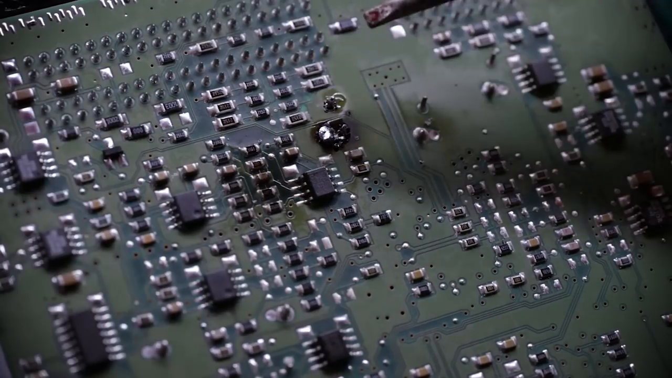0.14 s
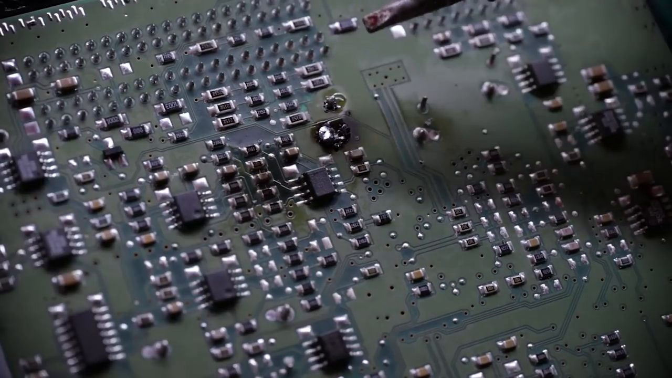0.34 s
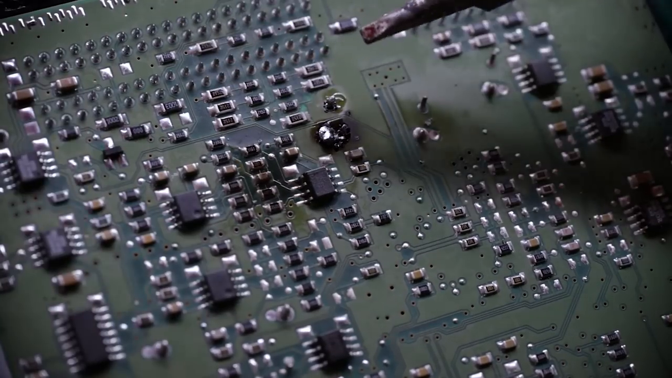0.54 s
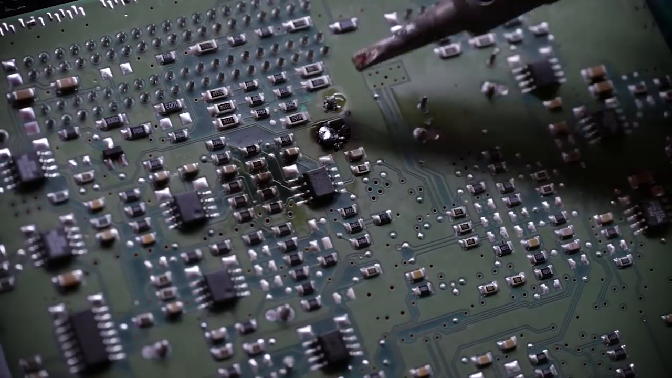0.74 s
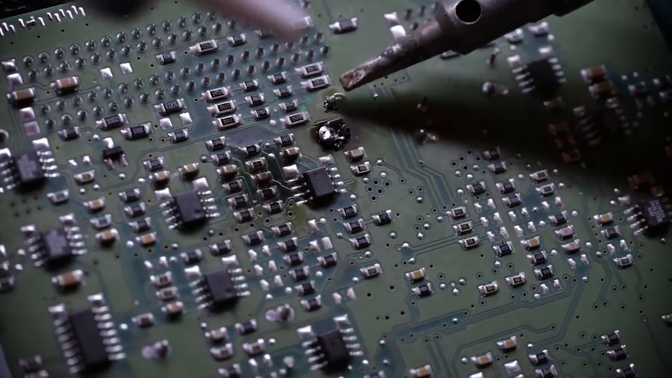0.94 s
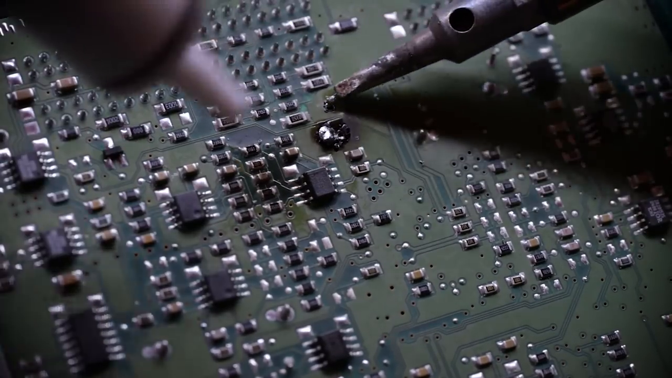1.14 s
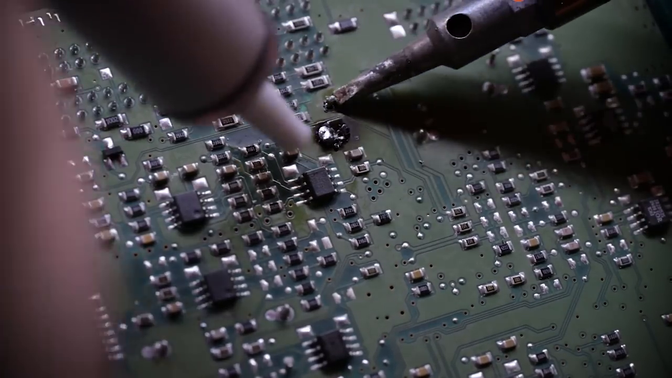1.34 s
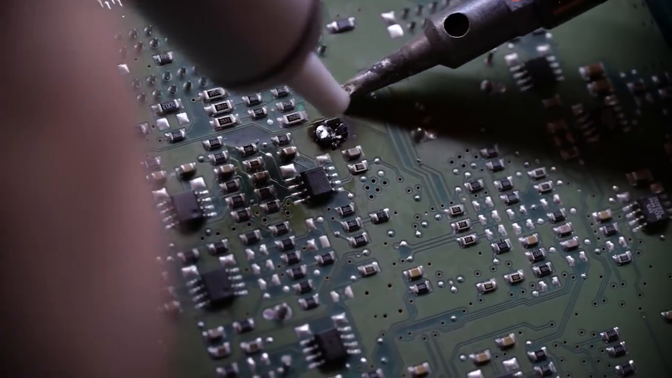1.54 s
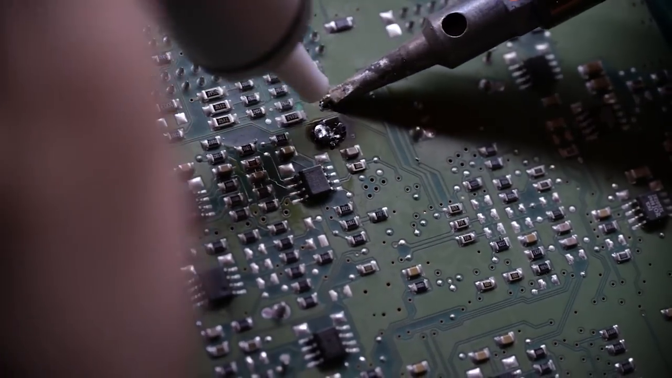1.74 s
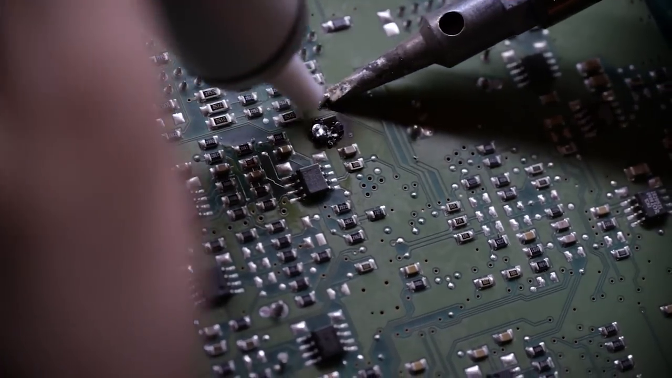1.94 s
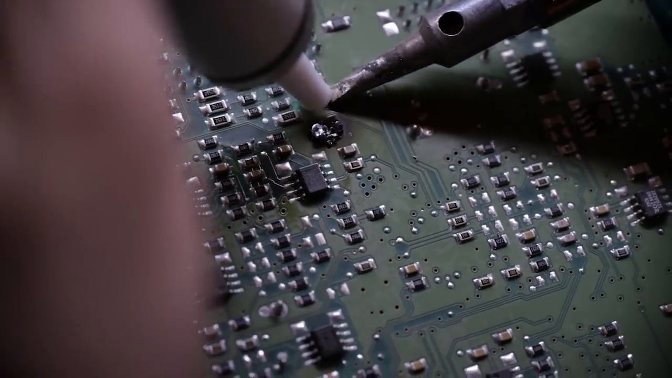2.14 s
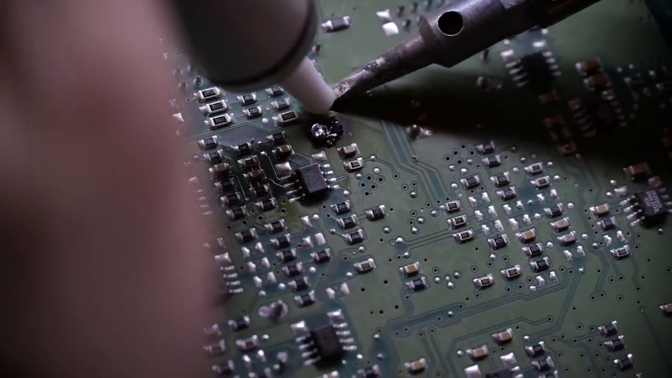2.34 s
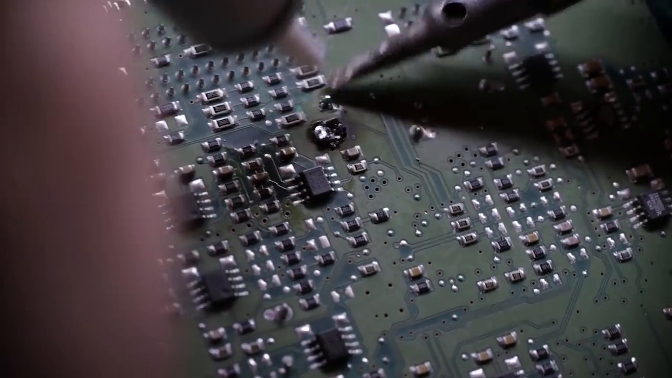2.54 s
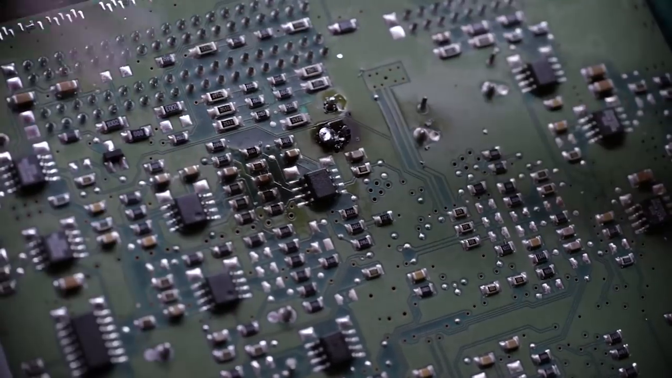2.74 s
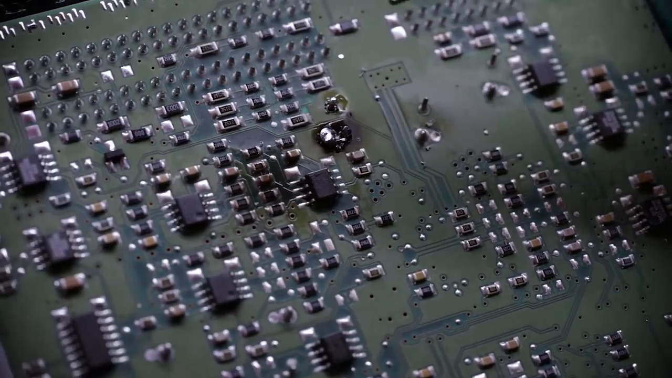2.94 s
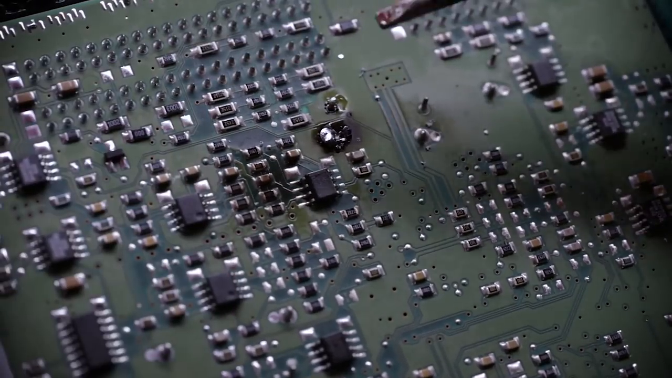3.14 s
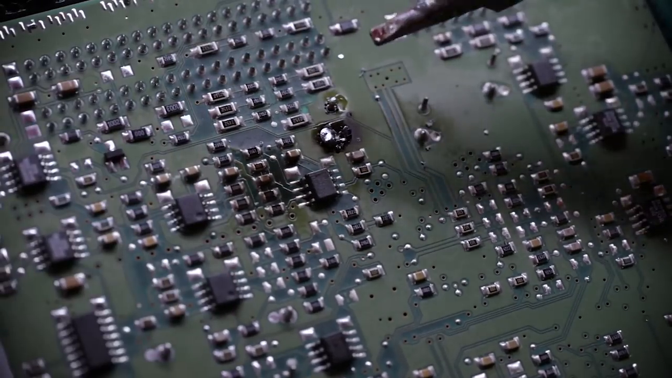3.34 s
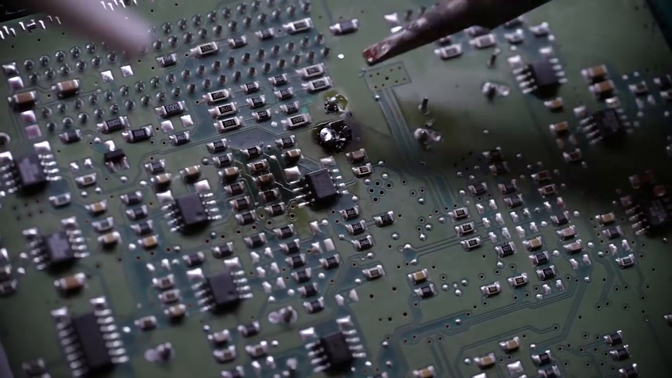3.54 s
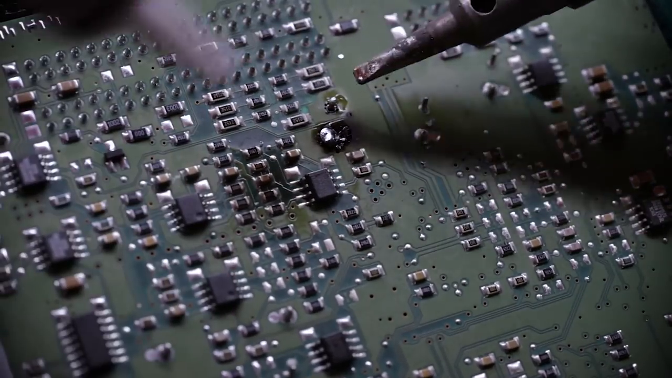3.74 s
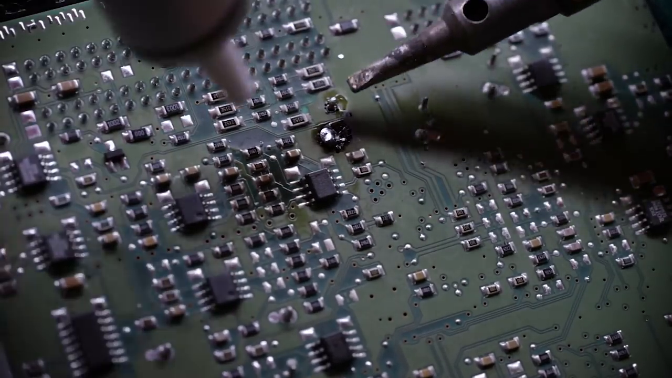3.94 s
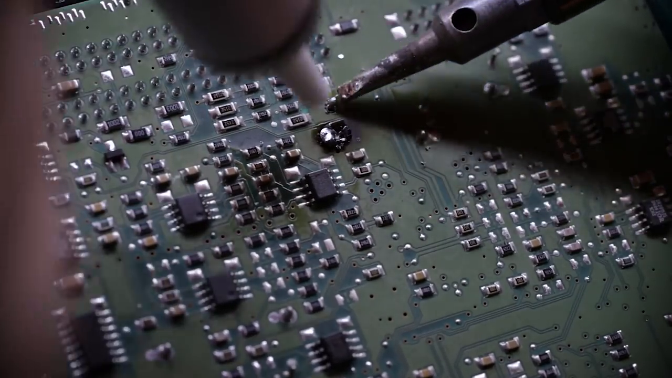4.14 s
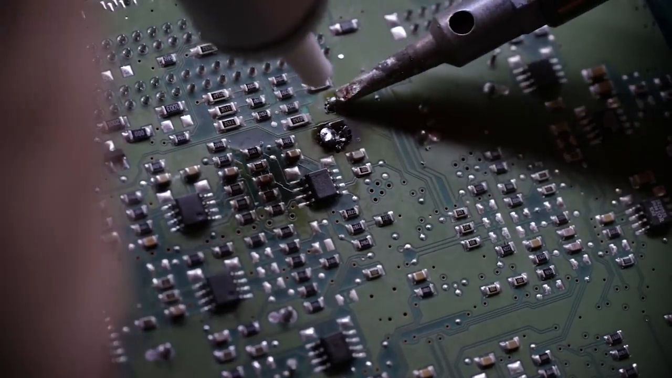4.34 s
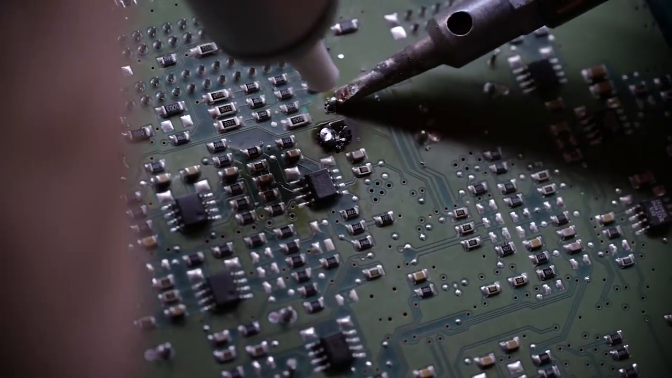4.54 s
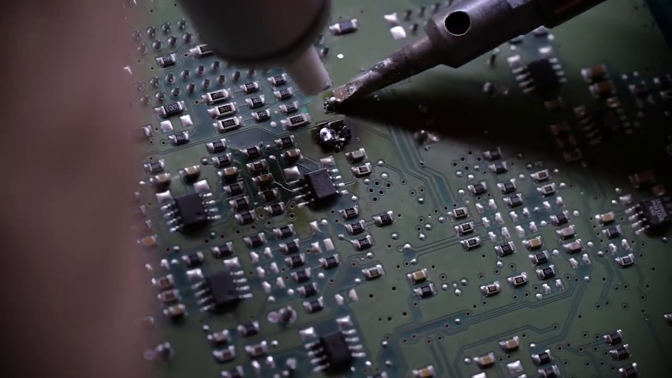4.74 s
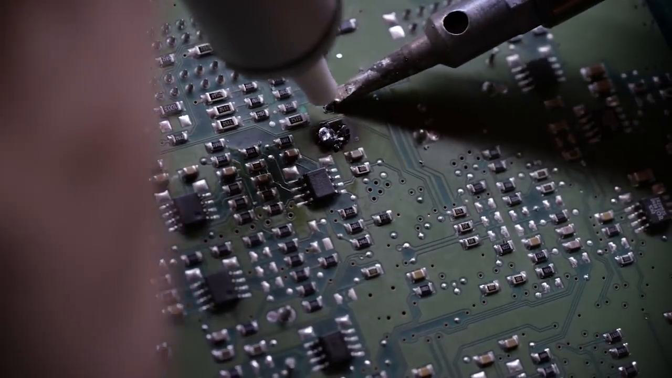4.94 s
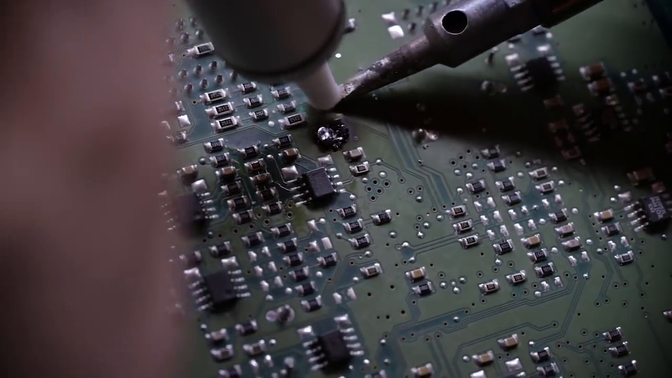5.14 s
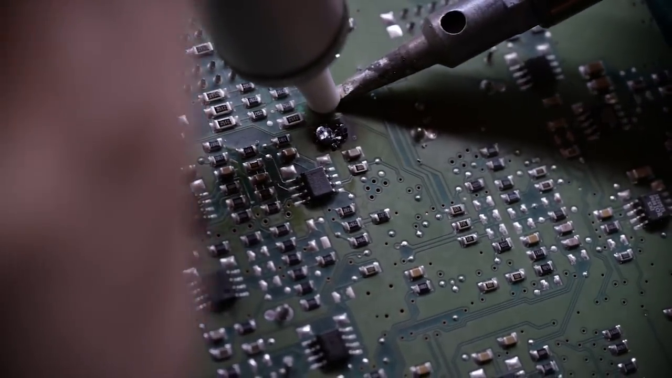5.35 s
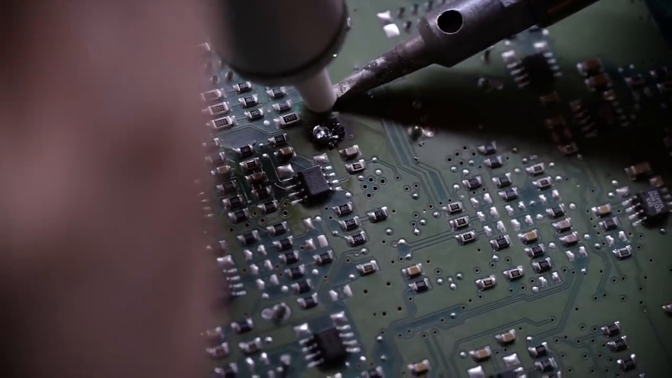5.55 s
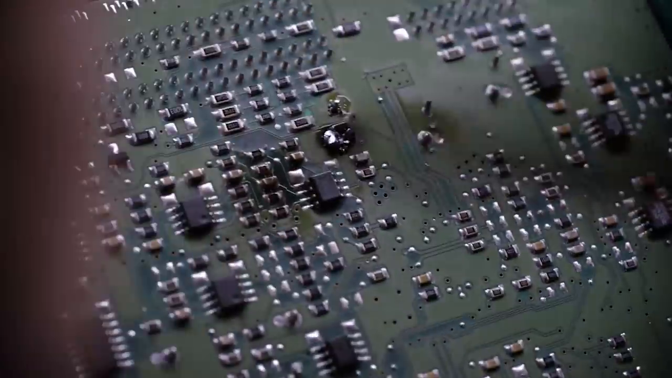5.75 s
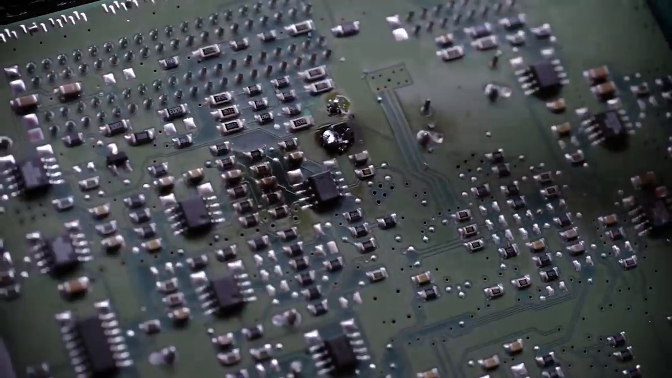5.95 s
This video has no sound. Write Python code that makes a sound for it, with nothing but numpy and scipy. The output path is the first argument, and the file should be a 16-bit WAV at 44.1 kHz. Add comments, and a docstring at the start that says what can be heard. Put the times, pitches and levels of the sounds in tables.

```python
"""Solder sucker at a workbench

A spring-loaded solder sucker is cocked and fired twice over a circuit board, with ticks and dull bumps of handling.
Cocking is grainy friction, leaking and puffing air and a catch; firing is a rush, a crack, rattle and decaying sines.
These contacts and air sounds are filtered noise, heard in a small room.
A fan hisses as noise through resonances; a motor hums as sines at multiples of its falling shaft speed."""
import sys
import numpy as np
from scipy import signal
from scipy.io import wavfile
from scipy.ndimage import uniform_filter1d

SR = 44100
rng = np.random.default_rng(int(sys.argv[2]) if len(sys.argv) > 2 else 0)


def to_wav(sig):
    """Store sig (one row per channel, or 1-D mono) as 16-bit WAV at the path in sys.argv[1].

    Samples outside -1..1 are clipped; the rate is SR.
    """
    pcm = np.clip(np.atleast_2d(sig), -1, 1) * 32767
    pcm = np.round(pcm).astype(np.int16)
    wavfile.write(sys.argv[1], SR, pcm.T)  # frames by channels


N = 265080
T = np.arange(N) / SR  # s

# Resonances of the pump's barrel and spring. Each row: frequency in Hz, width in Hz, lift in dB.
BARREL_MODES = [(2260, 140, 4), (2410, 25, 4.5), (2810, 130, 8), (3090, 140, 7.5), (3363, 41, 7),
                (3920, 70, 7.5), (4130, 100, 10), (4400, 140, 9.5), (4750, 60, 3), (5600, 110, 1.5),
                (6280, 36, 8), (6590, 140, 5.5), (8160, 300, 5.5), (11100, 81, -13), (14000, 47, 5)]


def gain_of(db):
    """Decibels to amplitude."""
    return 10 ** (np.asarray(db) / 20)


def read(points, hz):
    """A table of (Hz, value) interpolated on a log-frequency axis."""
    f, value = np.transpose(points)
    return np.interp(np.log(hz + 1), np.log(f + 1), value)


def colour(x, spectrum, modes=(), tilt_db_per_octave=0, size=8192):
    """Causal minimum-phase filter of unit energy: a broad spectrum with ringing resonances on it."""
    hz = abs(np.fft.fftfreq(size, 1 / SR))
    lift = 1 + sum((gain_of(db) ** 2 - 1) / (1 + (2 * (hz - f) / width) ** 2) for f, width, db in modes)
    broad_db = read(spectrum, hz) + tilt_db_per_octave * np.log2(1 + hz / 1000)
    gain = gain_of(broad_db) * np.sqrt(np.maximum(lift, 1e-3))
    # the Hilbert transform of log gain gives the minimum phase
    response = np.exp(np.conj(signal.hilbert(np.log(gain))))
    ring = np.fft.ifft(response).real[:size // 2]
    return signal.oaconvolve(x, ring / np.linalg.norm(ring))[:N]


def burst(peak_s, db, rise_s, fall_s):
    """Dense tiny contacts of random sign that swell up to peak_s and die away exponentially."""
    decay = np.maximum((peak_s - T) / rise_s, (T - peak_s) / fall_s)
    shape = np.exp(-np.minimum(decay, 50))
    return gain_of(db) * shape * rng.choice([-1., 1.], N)


def clumps(depth_db, size=64):
    """A random gain with an rms swing of depth_db, varying over about size samples."""
    wander = np.sqrt(size) * uniform_filter1d(rng.standard_normal(N), size)
    return gain_of(depth_db * wander)


def rub(start_s, end_s, db, grain_db):
    """Grainy sliding friction: noise of clumped level between two times."""
    gate = uniform_filter1d(1. * (T > start_s) * (T < end_s), size=60)
    return gain_of(db) * clumps(grain_db) * gate * rng.standard_normal(N)


def motor(between_db=-79.5):
    """The motor slows; each shaft order swells and fades as it sinks through the fixed resonances."""
    # Run-down. Each row: time in s, shaft speed in turns per s.
    run_down = [(0, 23.01), (1.2, 22.47), (2.4, 21.63), (3.6, 20.86), (5, 20.26), (6, 20.03)]
    # Humming shaft orders. Each row: multiple of shaft speed, relative strength in dB.
    orders = [(4, 0), (5, 0), (7, 0), (8, 0), (9, -16), (12, -16)]
    # Low resonances of casing, bench and room. Each row: frequency in Hz, width in Hz, level in dB.
    hum_modes = [(81.37, 4.6, -48.5), (83.56, 1.93, -43.5), (86.8, 0.98, -50.5), (89.55, 1.5, -46.5),
                 (91.1, .7, -53.5), (104.65, 3, -56.5), (110.26, 5.4, -53.5), (114.1, 2.2, -55),
                 (147.2, 8.9, -61), (156.2, 6.2, -60.5), (164.6, 3.1, -58.5), (177.64, 5, -56),
                 (184, 4.1, -55), (203, 12.6, -53.5), (259.4, 19, -59)]
    speed = np.interp(T, *np.transpose(run_down))
    turns = np.cumsum(speed) / SR
    hz = np.arange(60, 300, .1)
    power = gain_of(between_db) ** 2  # floor between the resonances
    for f, width, db in hum_modes:
        power = power + (gain_of(db) / (1 + (2 * (hz - f) / width) ** 2)) ** 2
    amplitude = np.sqrt(2 * power)  # rms to peak
    hum = np.zeros(N)
    for order, db in orders:
        level = gain_of(db) * np.interp(order * speed, hz, amplitude)
        hum += level * np.sin(2 * np.pi * (order * turns + rng.random()))
    return hum


def fan(db=-62, echo_db=-6, echo_s=0.016):
    """Steady hiss of moving air; quick echoes in the housing ripple its treble."""
    # Workshop air. Each row: frequency in Hz, level in dB.
    floor = [(20, -17), (50, -6), (75, 22), (180, 7.5), (290, -3.5), (420, 1.5), (680, -3), (1000, -1),
             (1700, -9), (2700, -3), (5500, -15), (10500, -15), (13000, -23), (16000, -28)]
    # The fan's resonances. Each row: frequency in Hz, width in Hz, lift in dB.
    fan_modes = [(775, 37, 7.7), (927, 20.3, 9.9), (2680, 43, 5.1), (3030, 59, 5.1), (3470, 325, 7.4),
                 (4780, 440, 7.4), (5350, 8.5, 2.1), (5700, 42, 5), (6140, 73, 4), (7400, 730, 9.5),
                 (7700, 150, 12.8), (8000, 48, 12), (8940, 193, 11.2)]
    hiss = colour(rng.standard_normal(N), floor, fan_modes)
    # differencing favours the treble
    echoes = np.diff(rng.standard_normal(2049)) * np.exp(-T[:2048] / echo_s)
    echoed = signal.oaconvolve(hiss, echoes / np.linalg.norm(echoes))[:N]
    return gain_of(db) * (hiss + gain_of(echo_db) * echoed)


def ticks(top_db=-8):
    """Light touches of metal and plastic, each with one broad ring and a band above it."""
    # Tool touches. Each row: time in s, level in dB, ring in Hz, decay in s, treble relative to ring in dB.
    touches = [(0.1464, -55.5, 4470, 0.0035, -17), (0.275, -55, 6000, 0.0011, -11),
               (0.531, -44, 3870, .005, -25), (1.6325, -58, 5230, .001, -16),
               (2.7738, -43, 3080, 0.0019, -16), (2.83, -54.5, 5000, 0.00098, -28),
               (2.979, -43, 5250, 0.00075, -18), (2.999, -57, 5650, .001, -18),
               (3.344, -51.5, 4100, 0.0088, -10), (5.59, -50, 5800, .001, -12),
               (5.8888, -40.5, 2900, 0.0017, -9.5)]
    out = np.zeros(N)
    for time_s, db, hz, length_s, treble_db in touches:
        ring = [(hz / 4, -34), (hz / 2.1, -20), (hz / 1.2, -2), (hz, 0), (hz * 1.16, -3),
                (hz * 1.74, treble_db), (10000, treble_db), (16000, treble_db + top_db)]
        out += colour(burst(time_s, db, 0.00038, length_s), ring)
    return out


def cockings(puff_s=0.023, latch_s=0.0037, leak_lead_s=0.036, chatter_db=-11, chatter_s=0.015):
    """The plunger slides down, air leaks past its seal and puffs from the barrel, and the catch drops in."""
    # Plunger strokes. Each row: start in s, bottom in s, slide in dB, leak in dB, puff in dB, puff rise in s.
    strokes = [(0.537, 0.717, -64.5, -65.5, -39.5, 0.0041), (3.288, 3.436, -65.5, -61.5, -40, 0.0035)]
    # The catch snaps in. Each row: time in s, level in dB.
    latches = [(0.8288, -36), (3.55, -40.5)]
    # Air column in the barrel. Each row: frequency in Hz, width in Hz, lift in dB.
    air_modes = [(2004, 68, 11.5), (2790, 110, 10), (3130, 71, 11), (3400, 46, 6.5), (4050, 77, 12),
                 (5460, 76, 4)]
    # Colour of slide and puff. Each row: frequency in Hz, level in dB.
    puff_colour = [(100, -15), (1450, -15.5), (1950, -4), (2400, -2), (3000, -2), (5000, -4), (8000, -9.5),
                   (13000, -18), (16000, -16)]
    # Air leaking past the piston seal. Each row: frequency in Hz, level in dB.
    leak_colour = [(1000, -23), (4000, -6), (7000, 6), (9000, -2), (12000, 12), (14500, -1.5), (16000, 7)]
    # Colour of the catch. Each row: frequency in Hz, level in dB.
    catch_colour = [(80, -19), (380, 0.5), (850, 3), (1200, -9), (1600, -1), (4000, -4.5), (6000, -6),
                    (9000, -15), (13000, -12.5), (16000, -18)]
    slide, air, leak, catch = np.zeros((4, N))
    for start_s, bottom_s, slide_db, leak_db, puff_db, rise_s in strokes:
        slide += rub(start_s, bottom_s, slide_db, grain_db=3.0)
        air += burst(bottom_s, puff_db, rise_s, puff_s)
        # a weak leak all the way, swelling shortly before the bottom
        leak += rub(start_s, bottom_s, leak_db - 11, grain_db=0.0)
        leak += burst(bottom_s - leak_lead_s, leak_db, 0.019, 0.015)
    for time_s, db in latches:
        catch += burst(time_s, db, 0.0018, latch_s)
        catch += burst(time_s, db + chatter_db, 0.0073, chatter_s)
    pump = colour(slide, puff_colour, BARREL_MODES) + colour(catch, catch_colour, BARREL_MODES)
    return pump + colour(air, puff_colour, air_modes) + colour(leak, leak_colour)


def bumps(rise_s=0.00079, length_s=0.0077, spread=1.37):
    """Short, heavily damped thuds of the pump against hand and board, with little treble."""
    # Each row: time in s, level in dB, ring in Hz.
    knocks = [(0.827, -53, 413), (1.436, -48.5, 420), (2.54, -39.5, 430), (3.425, -51, 223),
              (5.7, -47.5, 272), (5.719, -40.5, 258)]
    out = np.zeros(N)
    for time_s, db, hz in knocks:
        thud = [(hz / 8, -20), (hz / spread, -3), (hz, 0), (hz * spread, -7), (hz * 4, -35), (hz * 16, -70)]
        out += colour(burst(time_s, db, rise_s, length_s), thud)
    return out


def firings(run_up=0.9, buzz_db=-50, buzz_s=0.083):
    """The piston rushes up, cracks against its stop, and leaves the spring rattling, buzzing and ringing."""
    # Firings. Each row: trigger in s, piston at the stop in s, rush in dB, crack in dB, crack decay in s,
    # rattle in dB, rattle decay in s, treble tilt in dB per octave.
    shots = [(2.5236, 2.5344, -38, -16.5, 0.0011, -23.5, 0.013, 0.2),
             (5.7073, 5.7292, -40.5, -27, 0.0076, -38, 0.028, -0.56)]
    # Colour of the rush. Each row: frequency in Hz, level in dB.
    rush_colour = [(100, -8), (650, -11), (1150, -15), (2300, -13.5), (4000, -2), (6000, -7), (9000, -19),
                   (13300, -8.5), (16000, -17)]
    # Colour of crack and rattle. Each row: frequency in Hz, level in dB.
    slam_colour = [(40, -38), (150, -7.5), (550, -10), (900, -7), (1250, -14), (1750, -3.5), (3000, -3),
                   (4500, -2.5), (7000, -3.5), (9500, -7), (13300, -1), (16000, -18)]
    # Wooden bench under the board. Each row: frequency in Hz, width in Hz, lift in dB.
    bench_modes = [(258, 19, 9.5), (418, 40, 9), (592, 36, 10.5), (905, 120, 3)]
    # Dense buzz of the coils. Each row: frequency in Hz, level in dB.
    coil_colour = [(500, -24), (2000, -11.5), (3300, -7), (4600, -4), (5600, -13), (8300, -10),
                   (10000, -20), (16000, -25)]
    # Long rings of the steel spring. Each row: frequency in Hz, level relative to the crack in dB, t60 in s.
    spring_rings = [(3150, -33, 0.5), (4700, -41, 0.4), (6450, -33, 0.22), (6430, -38, .2), (8300, -32, .3),
                    (8150, -35, 0.28), (12140, -43, .15)]
    out = np.zeros(N)
    for trigger_s, stop_s, rush_db, crack_db, crack_s, rattle_db, rattle_s, tilt_db in shots:
        out += colour(rub(trigger_s, stop_s, rush_db, grain_db=-1.5), rush_colour)
        # a hard stop starts at once; a cushioned one builds up first
        rise_s = max(run_up * (crack_s - .001), 1e-4)
        crack = burst(stop_s, crack_db, rise_s, crack_s)
        # the coils slap the barrel in uneven clumps
        rattle = burst(stop_s, rattle_db, 1e-4, rattle_s) * clumps(depth_db=3.5)
        out += colour(crack + rattle, slam_colour, bench_modes + BARREL_MODES, tilt_db)
        buzz = burst(stop_s, buzz_db, 1e-4, buzz_s) * clumps(depth_db=2.0)
        out += colour(buzz, coil_colour)
        age_s = np.clip(T - stop_s, 0, 2)
        for hz, db, t60_s in spring_rings:
            # touching coils make each ring flutter
            flutter = clumps(depth_db=3.0, size=300)
            level = gain_of(crack_db + db - 60 * age_s / t60_s)
            out += flutter * level * np.sin(2 * np.pi * hz * age_s)
    return out


def room(x, gap_s=.006):
    """A small room: a diffuse tail, each band dying at its own speed."""
    # Each row: frequency in Hz, t60 in s.
    t60_points = [(150, 0.5), (600, 0.34), (1500, 0.16), (3800, .5), (8000, 0.52), (14000, 1)]
    # Each row: frequency in Hz, tail level in dB.
    tail_points = [(150, -2.5), (700, -12), (1800, -9.5), (4000, -17.5), (8000, -17), (14000, -25)]
    hz, t, z = signal.stft(rng.standard_normal(SR), SR, nperseg=256)
    t60_s = read(t60_points, hz)[:, None]
    decay = gain_of(read(tail_points, hz)[:, None] - 60 * t / t60_s)
    # keeps a band's energy independent of its decay time
    unit_energy = np.sqrt(np.log(1e6) / (t60_s * SR))
    diffuse = signal.istft(z * decay * unit_energy, SR, nperseg=256)[1]
    tail = np.r_[np.zeros(int(gap_s * SR)), diffuse]
    return x + signal.fftconvolve(x, tail)[:N]


def scene():
    """The pump and tools in the room, over motor and fan."""
    handling = ticks() + cockings() + bumps() + firings()
    return (room(handling) + motor() + fan())[None]


def record(dry, edge_hz=16100):
    """The recorder's band limit: a linear-phase low-pass."""
    lowpass = signal.firwin(301, edge_hz, window=("kaiser", 9), fs=SR)
    return signal.oaconvolve(dry, lowpass[None], "same")


dry = scene()
out = record(dry)
to_wav(out)
```